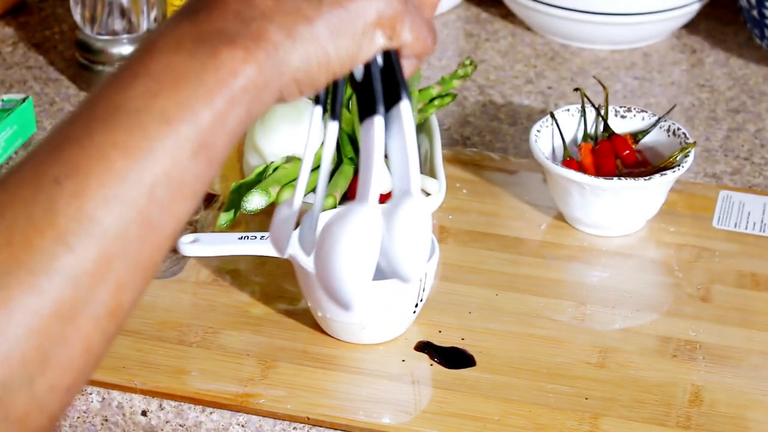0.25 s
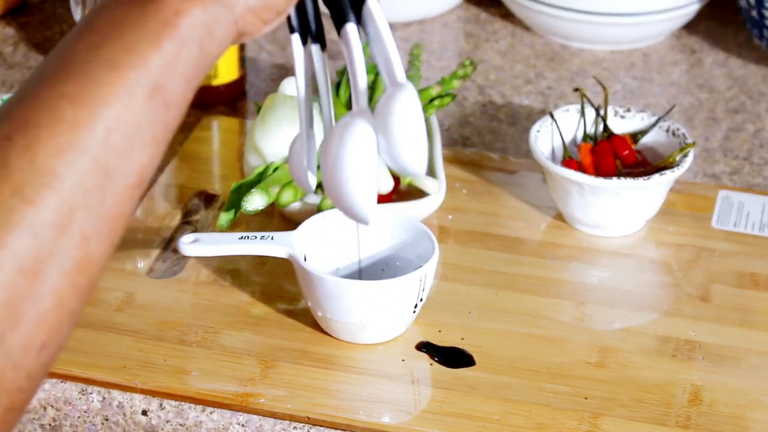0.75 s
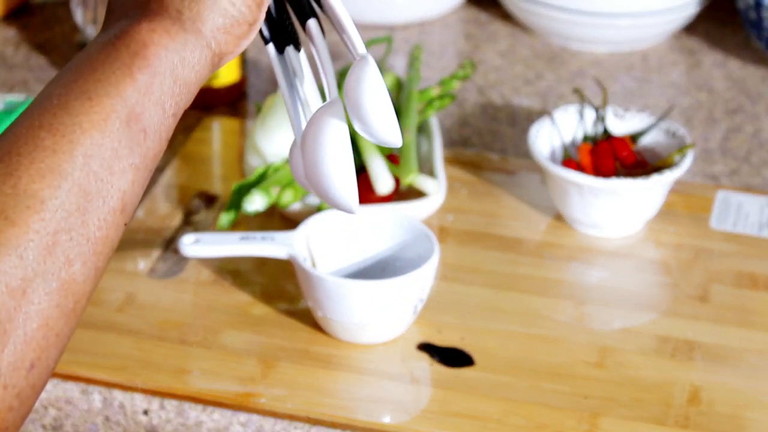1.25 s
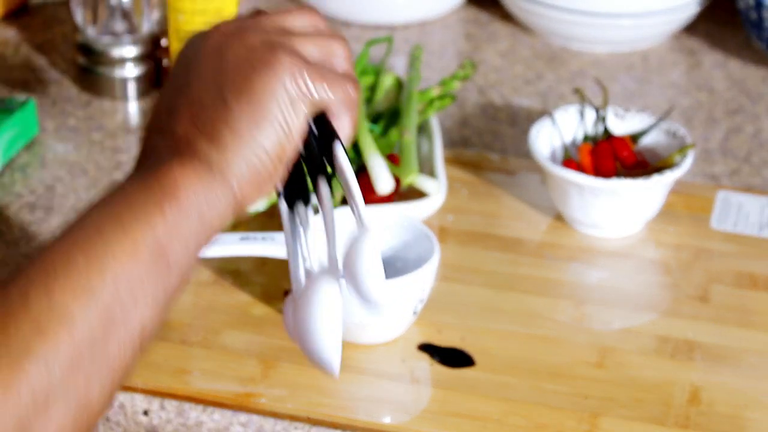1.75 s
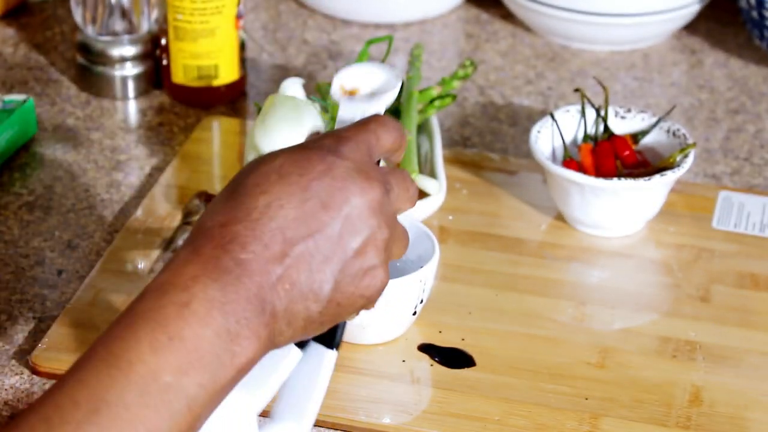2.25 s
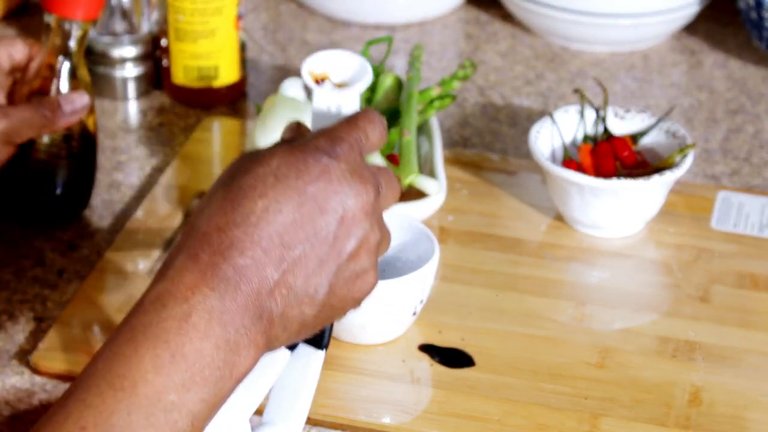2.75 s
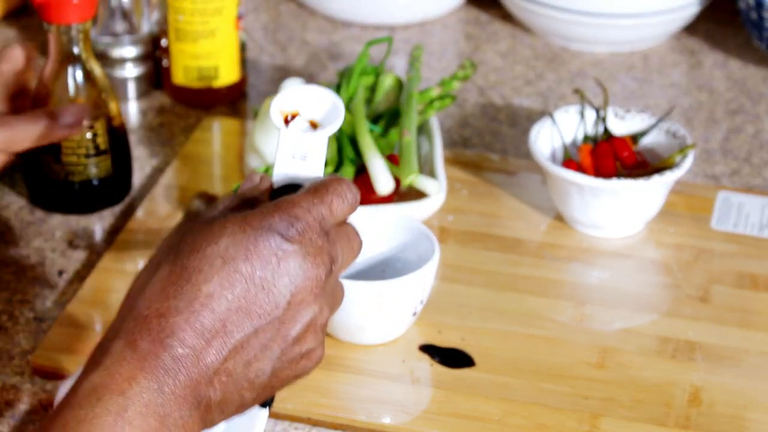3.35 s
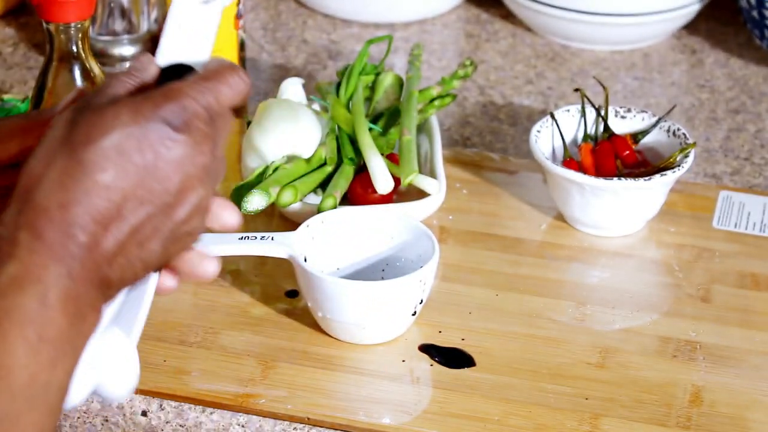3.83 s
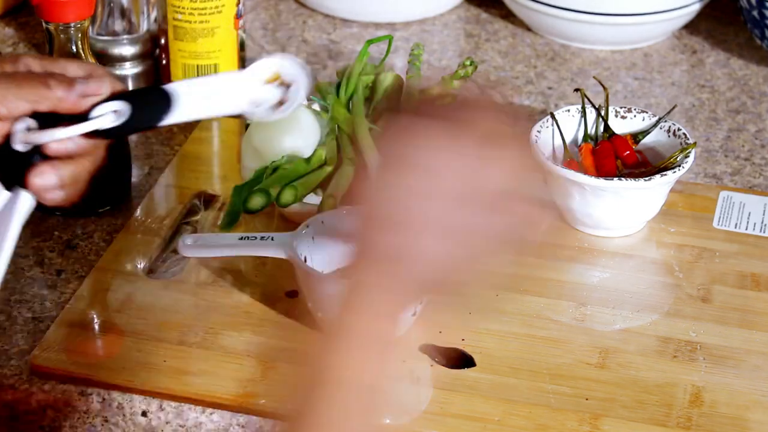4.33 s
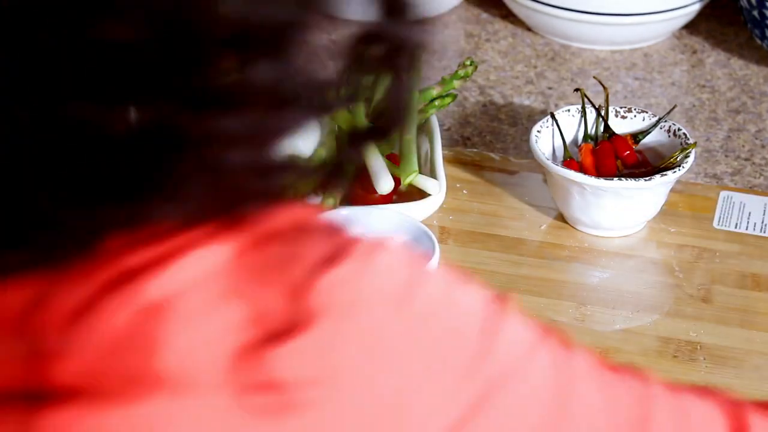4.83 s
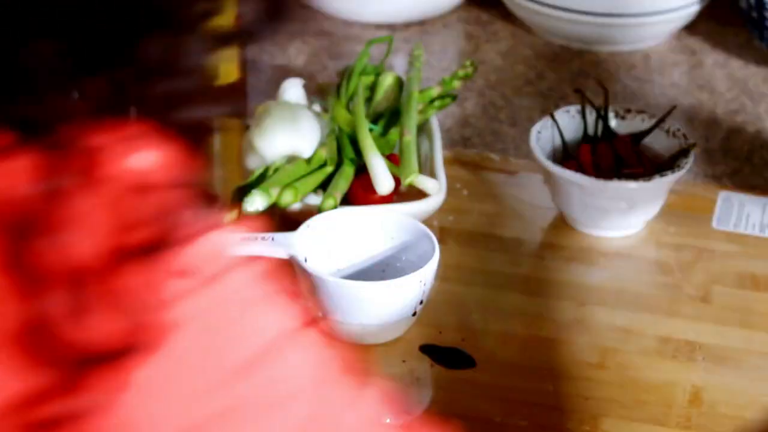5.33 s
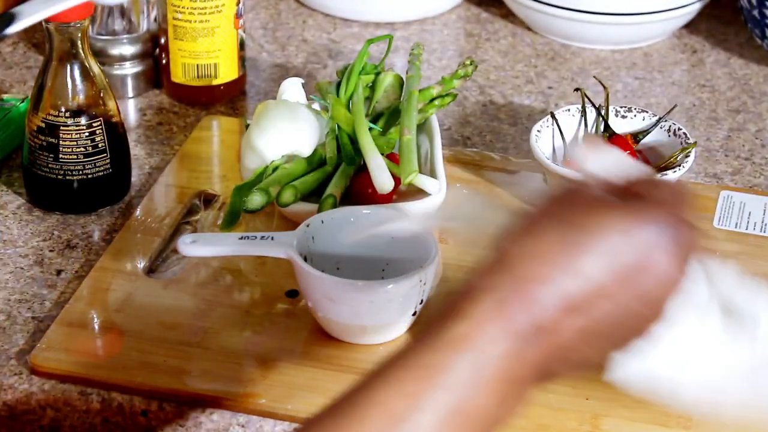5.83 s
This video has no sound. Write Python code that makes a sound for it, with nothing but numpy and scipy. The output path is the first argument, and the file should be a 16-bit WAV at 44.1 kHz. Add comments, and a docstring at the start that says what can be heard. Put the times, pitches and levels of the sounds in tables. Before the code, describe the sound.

Plastic measuring spoons tap softly, a glass bottle knocks hard on a kitchen counter twice, then the spoons clatter sharply.

```python
"""Measuring spoons and a sauce bottle

Plastic measuring spoons on a steel ring swing, tap and clatter above a wooden board in a small kitchen.
A glass sauce bottle lands hard on the counter, cap buzzing, judders along and is knocked down again.
The spoons change hands with a sharp clatter, then the cook leans across with soft bumps and a rustle
of clothes. Quiet room tone lies underneath, and a faint low tone wavers at the end."""
import sys
import numpy as np
from scipy import signal
from scipy.fft import rfft, irfft, next_fast_len
from scipy.io import wavfile

SR = 44100
rng = np.random.default_rng(int(sys.argv[2]) if len(sys.argv) > 2 else 0)


def wav_out(sig):
    """Save sig, one row per channel (or a flat mono array), as 16-bit PCM at SR to the path in sys.argv[1]."""
    wavfile.write(sys.argv[1], SR, np.round(np.clip(np.atleast_2d(sig).T, -1, 1) * 32767).astype(np.int16))


N = 268392
TIME = np.arange(N) / SR
TAIL = TIME[:SR // 2]   # time axis of a single hit

# room tone of the still kitchen: (frequency [Hz], level [dB])
AIR_SPECTRUM = [(15, -46), (25, -9.5), (120, -9), (145, -8.5), (217, -5), (405, -7), (463, -9.5),
                (531, -2.5), (887, -9), (962, -6), (1840, -30), (2990, -26.5), (3340, -23.5), (7110, -25),
                (16000, -32.5)]
# stereo width of diffuse noise: (frequency [Hz], side gain [dB])
DIFFUSE_WIDTH = [(60, -4.5), (400, -9.5), (1300, -5), (2400, -0.5), (15000, 0)]
# stereo width of the reflections: (frequency [Hz], side gain [dB])
ROOM_WIDTH = [(100, -23.5), (500, -15.5), (1200, -11), (2500, -2), (6000, -0.5), (15000, 0)]
# reverb time of the kitchen: (frequency [Hz], t60 [s])
ROOM_DECAY = [(100, 0.43), (400, 0.31), (1200, 0.42), (3000, 0.36), (6000, 0.29), (14000, 0.25)]
# path of the faint low tone: (time [s], pitch [Hz], level [dB])
LOW_TONE_PATH = [(5.42, 301.6, -72), (5.5, 297.3, -55), (5.64, 276.4, -59.5), (5.76, 307, -56.5),
                 (5.98, 295, -61.5), (6.04, 347, -50.5), (6.09, 352.3, -48.5)]

# rubbing cloth: (frequency [Hz], level [dB])
CLOTH_SPECTRUM = [(60, -3.5), (200, 2), (500, 1.5), (1200, -1.5), (2500, -3.5), (6000, -14.5), (10000, -18),
                  (15000, -40)]
# a sleeve brushing past: (frequency [Hz], level [dB])
SLEEVE_SPECTRUM = [(2000, -16), (6500, 4), (11000, -7), (15000, -19)]
# the cook leans in and straightens up: (time [s], hold [s], level [dB])
COOK_LEANS = [(4.84, 0.084, -52), (5.475, 0.23, -53)]
# the cook bumps the counter: (time [s], level [dB], centre [Hz])
COOK_BUMPS = [(4.693, -39, 188), (4.722, -39.5, 615), (4.742, -47.5, 140), (4.802, -37, 840),
              (4.951, -48.5, 300), (5.425, -41.5, 384)]

# the steel ring ticks in the handles: (time [s], level [dB], centre [Hz])
RING_TICKS = [(0.144, -56.5, 12400), (0.484, -59, 12500), (0.649, -49.5, 7000), (0.9157, -48.5, 7550),
              (2.46, -53.5, 5100), (3.8449, -39.5, 4800)]
# ring of the spoon bowls: (frequency [Hz], level [dB], t60 [s])
SPOON_BOWL_MODES = [(690, -13, .04), (813, -8, .05), (1015, -6, .055), (1300, -9, .025), (1500, -13, .035),
                    (1740, -4, .018), (2115, 0, .034), (2420, -10, .02), (4300, -12, .006)]
# the bowls' dense, fast modes: (frequency [Hz], level [dB])
BOWL_SPECTRUM = [(300, -7), (800, -4.5), (2000, 8), (3000, 1.5), (5000, -1.5), (7500, -9.5), (12000, -0.5),
                 (15000, -7)]
# ring of the spoon handles: (frequency [Hz], level [dB], t60 [s])
SPOON_HANDLE_MODES = [(2850, -1, .02), (2985, 0, .028)]
# the hanging spoons meet softly once a swing:
# (time [s], level [dB], meetings [count], period [s], loss per swing [dB], handle boost [dB])
SPOON_SWINGS = [(0.008, -48, 3, .126, 3, -2.5), (0.938, -47.5, 2, .11, 7.5, 3.5),
                (1.243, -60, 1, .12, 0, 12), (1.797, -49, 3, 0.13, 1.1, -2.5), (2.657, -53.5, 1, .12, 0, 2),
                (3.482, -48.5, 3, .123, -0.5, -0.5), (3.864, -47, 1, .12, 0, 6),
                (5.232, -45, 2, .106, 5, 6.5), (5.622, -49.5, 2, .057, 9, 1)]
# a jerk of the hand throws the bowls together: (time [s], level [dB], brightness [Hz], rebound [dB])
SPOON_JOLTS = [(0.492, -40.5, 8000, -46.5), (0.674, -41.5, 6900, -67), (0.763, -40.5, 7900, -45.5),
               (1.625, -40.5, 6460, -52.5), (2.493, -39, 7300, -46), (4.602, -43.5, 7100, -67),
               (5.495, -40.5, 9000, -47)]
# ring of the spoon shafts, all damped alike: (frequency [Hz], level [dB])
SPOON_SHAFT_MODES = [(680, -19), (965, -9), (1120, -13), (1590, -16), (2040, -11), (2190, -13), (2935, 2),
                     (3146, 0), (3380, -1), (3500, -1), (3700, -6), (4220, -6), (4720, -6), (8050, -12),
                     (10790, -8), (12550, -15)]
# the shafts' dense modes: (frequency [Hz], level [dB])
SHAFT_SPECTRUM = [(300, -33), (1000, -6.5), (2000, -2), (3200, 8.5), (5000, -5), (7000, -6), (9500, -9.5),
                  (12500, -7), (15500, -25)]
# high ring of a spoon's edge: (frequency [Hz], level [dB], t60 [s])
SPOON_EDGE_MODES = [(5670, -2, .12), (5722, 0, .12), (5792, -1, .1), (5950, -5, .05), (6050, -5, .06),
                    (6130, -1, .1), (6255, -3, .07), (6450, -7, .03)]
# snap of a spoon's edge: (frequency [Hz], level [dB])
EDGE_SPECTRUM = [(4000, -40), (5300, -7), (5750, 1), (6250, -1), (6900, -9), (9000, -28.5)]
# the bunch of spoons clacks together:
# (time [s], shaft level [dB], brightness [Hz], edge level [dB], pitch of the dense modes [ratio])
SPOON_CLACKS = [(3.8979, -25.5, 8500, -34, 1.05), (3.9334, -24.5, 12900, -22, 1.13),
                (3.9507, -27, 13000, -24, 1.0), (4.0931, -33.5, 3500, -53, 1.2),
                (4.105, -32.5, 5500, -36.5, 0.79), (4.1171, -28.5, 13500, -38.5, 1.52),
                (4.137, -36.5, 7000, -60, 1.26), (4.183, -40, 7000, -62, 1.5),
                (4.2237, -43.5, 2000, -68, 0.34)]

# ring of the bottle cap: (frequency [Hz], level [dB], t60 [s])
BOTTLE_CAP_MODES = [(2650, -4, .01), (3800, 0, .008), (4250, -4, .008), (5650, 0, .009), (6600, -4, .003),
                    (8020, 0, .011), (10600, -5, .006), (13000, -11, .003)]
# ring of counter and board: (frequency [Hz], level [dB], t60 [s])
WORKTOP_MODES = [(118, -17, .16), (176, -18, .14), (275, -10, .12), (312, 3, .055), (349, -4, .14),
                 (396, -5, .08), (480, 2, .11), (533, -8, .1), (593, -2, .17), (665, -9, .1),
                 (711, -5, .095), (806, -10, .12), (937, -10, .12), (1010, -13, .12), (1100, -15, .1),
                 (1337, -14, .1), (1620, -17, .06), (2080, -11, .04)]
# dense modes of counter and board: (frequency [Hz], level [dB])
WORKTOP_SPECTRUM = [(30, -31), (110, -12.5), (200, -10.5), (350, 3), (700, 4), (1300, -8), (2200, -7),
                    (4000, -14.5), (8000, -20.5), (15000, -13)]
# the bottle hits the counter: (time [s], level [dB], brightness [Hz])
BOTTLE_KNOCKS = [(2.7994, -5, 1250), (3.1390, -35.5, 600), (3.2190, -19, 2550), (3.2235, -12.5, 1760),
                 (3.2344, -17, 1000)]


def from_db(db):
    """Decibels to gain."""
    return 10 ** (np.asarray(db) / 20)


def unit_power(x):
    """Scale to unit power."""
    return x / np.sqrt(np.mean(x ** 2) + 1e-20)


def unit_blow(x):
    """Give a hit the energy of 10 ms at unit power."""
    return x / np.sqrt(np.sum(x ** 2) / (SR // 100) + 1e-20)


def at_hz(points, hz):
    """Read a table on a log-frequency axis."""
    frequencies, values = np.transpose(points)
    return np.interp(np.log(np.maximum(hz, 1)), np.log(frequencies), values)


def colour(x, spectrum):
    """Minimum-phase EQ: shapes the tone with no ringing ahead of the attack."""
    size = 2 * next_fast_len(x.shape[-1])
    gain = from_db(at_hz(spectrum, np.arange(size // 2 + 1) * SR / size))
    cepstrum = irfft(np.log(gain))
    cepstrum[1:size // 2] *= 2
    cepstrum[size // 2 + 1:] = 0
    return irfft(rfft(x, size) * np.exp(rfft(cepstrum)))[..., :x.shape[-1]]


def soften(x, hz):
    """Low-pass: a softer contact lasts longer and loses its treble."""
    return signal.sosfilt(signal.butter(2, hz, fs=SR, output="sos"), x + 1e-18)


def decay(t60):
    """Envelope that falls 60 dB in t60 seconds."""
    return 1000.0 ** (-TAIL / t60)


def swell(s, hold_s, rise_s, fall_s):
    """Attack, hold from time s, release; rise and fall are times per 20 dB."""
    attack = np.maximum(s - TIME, 0) / rise_s
    release = np.maximum(TIME - s - hold_s, 0) / fall_s
    return 10 ** -np.minimum(attack + release, 10)


def add(track, s, sound):
    """Mix a sound in at time s."""
    part = track[round(s * SR):][:len(sound)]
    part += sound[:len(part)]


def ring(modes, spread_db):
    """Struck modes; every hit lands elsewhere and weights them anew."""
    offsets_db = rng.normal(0, spread_db, len(modes))
    partials = ((-1) ** k * from_db(db + offsets_db[k]) * np.sin(2 * np.pi * hz * TAIL) * decay(t60)
                for k, (hz, db, t60) in enumerate(modes))
    return unit_blow(sum(partials))


def crack(spectrum, t60):
    """Crowded, quickly dying modes blur into a burst of coloured noise."""
    return unit_blow(colour(rng.standard_normal(len(TAIL)) * decay(t60), spectrum))


def stereo(mid, side, width):
    """Left and right share the bass and drift apart in the treble."""
    return mid + colour(side, width) * np.array([[1], [-1]])


def hiss(spectrum):
    """Diffuse stereo noise, leaning slightly right."""
    mid, side = unit_power(colour(rng.standard_normal((2, N)), spectrum))
    return stereo(mid, side, DIFFUSE_WIDTH) * from_db([[-.9], [.7]])


def kitchen(x, near_db, room_db, pan_db=-1.5):
    """Direct sound, a spray of reflections from the worktop, and a tail that dies band by band."""
    edges, tail = np.geomspace(50, 18000, 13), 0
    white = rng.standard_normal((2, 2, len(TAIL)))
    for k, (low, high) in enumerate(zip(edges, edges[1:])):
        band = signal.sosfilt(signal.butter(2, [low, high], "band", fs=SR, output="sos"), white[k % 2])
        tail = tail + band * decay(at_hz(ROOM_DECAY, np.sqrt(low * high)))
    tail = tail * (1 - decay(.02))   # the reverb takes a moment to build
    near = rng.standard_normal(len(TAIL)) * decay(.041)
    near = from_db(near_db) * near / np.linalg.norm(near)
    mid, side = from_db(room_db) * tail / np.linalg.norm(tail[0])
    direct = TAIL == 0
    response = stereo(direct + mid, side + near, ROOM_WIDTH)
    return signal.fftconvolve(x[None], response, axes=1)[:, :N] * from_db([[pan_db / 2], [-pan_db / 2]])


def room_tone(level_db=-56):
    """The steady air of the still kitchen."""
    return from_db(level_db) * hiss(AIR_SPECTRUM)


def low_tone(waver=.31):
    """A faint low tone glides about, unsteady in level and pitch."""
    s, hz, db = np.transpose(LOW_TONE_PATH)
    flicker, wobble = waver * unit_power(soften(rng.standard_normal((2, N)), 30))
    phase = 2 * np.pi * np.cumsum(np.interp(TIME, s, hz)) / SR
    envelope = from_db(np.interp(TIME, s, db)) * (TIME > s[0])
    return envelope * (1 + flicker) * np.sin(phase + wobble)


def clothes(flutter_db=1.5, arms_db=-63, sleeve_db=-58):
    """Cloth rubs in small uneven folds, louder with each lean; a sleeve swishes once."""
    folds = from_db(flutter_db * unit_power(soften(rng.standard_normal(N), 39.5)))
    lean_power = sum((from_db(db) * swell(s, hold_s, rise_s=.68, fall_s=.69)) ** 2
                     for s, hold_s, db in COOK_LEANS)
    rustle = np.sqrt(from_db(arms_db) ** 2 + lean_power)
    sleeve = from_db(sleeve_db) * swell(4.87, hold_s=.04, rise_s=.03, fall_s=.09)
    return folds * (rustle * hiss(CLOTH_SPECTRUM) + sleeve * hiss(SLEEVE_SPECTRUM))


def soft_bumps(settle_s=.019, settle_loss_db=5.5):
    """The cook leans on the counter: each padded thud settles with a second, weaker contact."""
    out = np.zeros(N)
    for s, db, hz in COOK_BUMPS:
        thud = [(hz / 6, -16), (hz * .64, -4), (hz, 0), (hz * 1.66, -6), (hz * 3.05, -17), (hz * 12, -42)]
        add(out, s, from_db(db) * crack(thud, t60=.098))
        add(out, s + settle_s, from_db(db - settle_loss_db) * crack(thud, t60=.044))
    return out


def steel_ring():
    """The ring catches in the handles: thin ticks, each about an octave wide."""
    out = np.zeros(N)
    for s, db, hz in RING_TICKS:
        tick = [(hz / 4, -35), (hz * .47, -14), (hz * .86, -1), (hz, 0), (hz * 1.63, -8), (hz * 2.1, -24)]
        add(out, s, from_db(db) * crack(tick, t60=.056))
    return out


def bowl_meetings(swing_s=.038, jolt_s=.036, rebound_s=.024):
    """The bowls meet: (time [s], length [s], level [dB], brightness [Hz], handle boost [dB])."""
    for s, db, count, period_s, loss_db, handle_db in SPOON_SWINGS:
        for k in range(count):
            yield s + k * period_s, swing_s, db - k * loss_db, 3120, handle_db
    for s, db, bright_hz, rebound_db in SPOON_JOLTS:
        yield s, jolt_s, db, bright_hz, -4
        yield s + jolt_s, rebound_s, db - 12, 3500, 3.5   # the handles shiver on as the bowls part
        yield s + .068, rebound_s, rebound_db, 3500, 3.5   # the bowls fall back


def swinging_spoons(touches_per_s=5000):
    """Each meeting of the loose bowls is a buzz of tiny touches: soft ones swell, hard ones snap in."""
    out = np.zeros(N)
    for s, length_s, db, bright_hz, handle_db in bowl_meetings():
        span = round(length_s * SR)
        touches = rng.choice([-1, 1], len(TAIL)) * (rng.random(len(TAIL)) < touches_per_s / SR)
        hardness = np.clip(bright_hz / 3500 - 1, 0, 1)
        progress = np.arange(2 * span) / span
        attack = np.minimum(1, hardness + 2 * progress)
        release = np.minimum(1, np.exp(5 * (.8 - progress)))
        bowl = ring(SPOON_BOWL_MODES, spread_db=1) + from_db(3.5) * crack(BOWL_SPECTRUM, t60=.008)
        handle = from_db(handle_db - .5) * ring(SPOON_HANDLE_MODES, spread_db=1.5)
        force = attack * release * touches[:2 * span]
        buzz = soften(signal.fftconvolve(force, bowl + handle), bright_hz)
        add(out, s, from_db(db) * buzz / (np.std(buzz[:span]) + 1e-12))
    return out


def clattering_spoons(shaft_t60=.04, neighbour_s=.005):
    """Hard double clacks ring the shafts; those that catch an edge add a longer, high ring."""
    out = np.zeros(N)
    shaft_modes = [(hz, db, shaft_t60) for hz, db in SPOON_SHAFT_MODES]
    for s, db, bright_hz, edge_db, pitch in SPOON_CLACKS:
        spectrum = [(hz * pitch, level) for hz, level in SHAFT_SPECTRUM]   # a smaller spoon sounds higher
        for hit_s in (s, s + neighbour_s):   # each struck spoon at once hits its neighbour
            shaft = ring(shaft_modes, spread_db=2) + from_db(1.5) * crack(spectrum, t60=.028)
            edge = ring(SPOON_EDGE_MODES, spread_db=1) + from_db(-2) * crack(EDGE_SPECTRUM, t60=.01)
            add(out, hit_s, from_db(db) * unit_blow(soften(shaft, bright_hz)))
            add(out, hit_s, from_db(edge_db) * unit_blow(edge))
    return out


def rattling_cap(touches_per_s=1500, bright_hz=11500):
    """The bottle's first knock throws the loose cap, which buzzes on the neck and settles."""
    touches = rng.standard_normal(N) * (rng.random(N) < touches_per_s / SR)
    click = [(1000, -12), (3500, 0), (7000, -3), (11000, -8), (15000, -16)]
    cap = ring(BOTTLE_CAP_MODES, spread_db=1) + crack(click, t60=.004)
    rattle = unit_power(soften(signal.fftconvolve(touches, cap)[:N], bright_hz))
    s = BOTTLE_KNOCKS[0][0] + .002
    jolt = from_db(-35) * swell(s, hold_s=0, rise_s=.001, fall_s=.018)
    buzz = from_db(-49) * swell(s, hold_s=.078, rise_s=.001, fall_s=.038)
    return (jolt + buzz) * rattle


def sliding_bottle(start_s=2.99, length_s=.216, rise_s=.075, judder_hz=268.7, climb_hz_per_s=150):
    """The glass foot sticks and slips unevenly over grit, juddering quicker as it gathers speed."""
    hz = judder_hz + climb_hz_per_s * np.clip(TIME - start_s, -rise_s, length_s)
    phase = 2 * np.pi * np.cumsum(hz) / SR
    grip, wobble = .65 * unit_power(soften(rng.standard_normal((2, N)), 30))
    judder = (.8 + grip) * np.sin(phase + wobble)
    grit_spectrum = [(80, -21), (250, -8.5), (520, -5), (750, -24), (1500, -28.5), (6000, -74.5)]
    grit = from_db(-7) * unit_power(colour(rng.standard_normal(N), grit_spectrum))
    push = from_db(-37) * swell(start_s, length_s, rise_s, fall_s=.029)
    return push * (judder + grit)


def foot_contacts():
    """The bottle's foot meets the counter: (time [s], level [dB], brightness [Hz])."""
    for s, db, bright_hz in BOTTLE_KNOCKS:
        yield s, db, bright_hz
        yield s + .042, db - 19, 1200   # it bounces once
        yield s + .127, db - 18.5, 560   # and rocks back with a dull bump


def bottle_knocks():
    """Each hit drives the counter: a punch, a dense thud and a ring, duller when the contact is soft."""
    out = np.zeros(N)
    punch = from_db(-5) * unit_blow(colour(1.0 * (TAIL == 0), WORKTOP_SPECTRUM))
    for s, db, bright_hz in foot_contacts():
        modes = ring(WORKTOP_MODES, spread_db=1)
        thud = from_db(3.5) * crack(WORKTOP_SPECTRUM, t60=.035)
        add(out, s, from_db(db) * unit_blow(soften(punch + thud + modes, bright_hz)))
    return out


def scene():
    """Spoons, cap and counter get their own reverb sends, over clothes, low tone and room tone."""
    taps = kitchen(swinging_spoons(), near_db=3, room_db=-17)
    clatter = kitchen(clattering_spoons() + steel_ring(), near_db=-4, room_db=-5)
    cap = kitchen(rattling_cap(), near_db=-3, room_db=2.5)
    counter = kitchen(bottle_knocks() + sliding_bottle() + soft_bumps(), near_db=-4.5, room_db=-6.5)
    return taps + clatter + cap + counter + clothes() + low_tone() + room_tone()


def record(dry):
    """Master chain: cut the rumble, round off the loudest peaks, trim the very top."""
    low_cut_hz, ceiling, high_cut_hz = 38, 1.2, 15750
    dry = signal.sosfilt(signal.butter(2, low_cut_hz, "high", fs=SR, output="sos"), dry)
    rounded = ceiling * np.tanh(dry / ceiling)
    return signal.sosfilt(signal.ellip(10, .1, 80, high_cut_hz, fs=SR, output="sos"), rounded)


dry = scene()
out = record(dry)
wav_out(out)
```